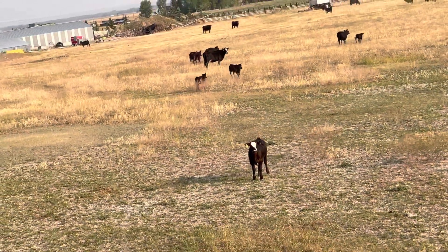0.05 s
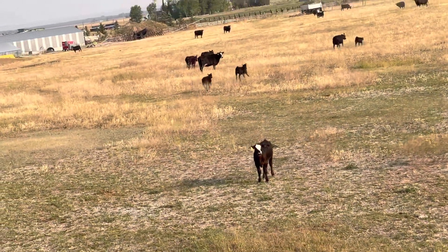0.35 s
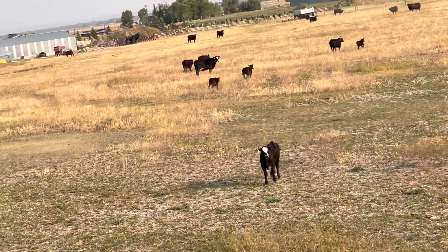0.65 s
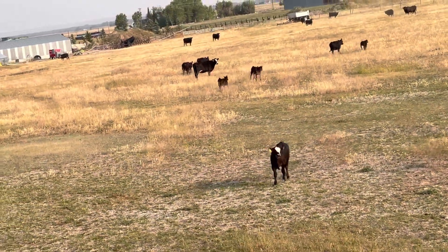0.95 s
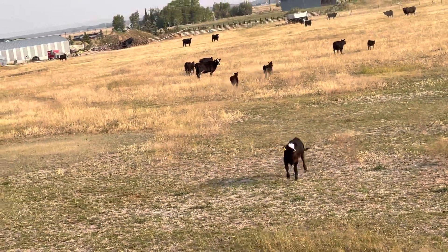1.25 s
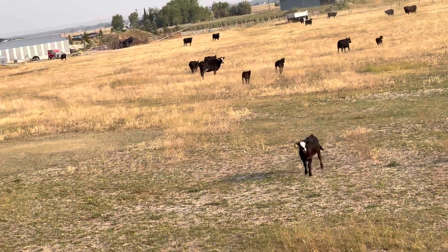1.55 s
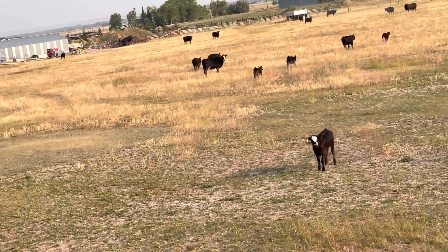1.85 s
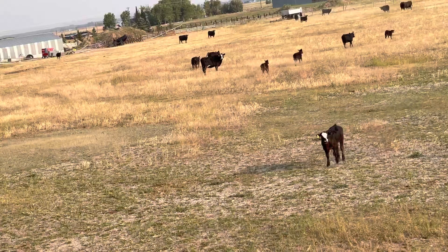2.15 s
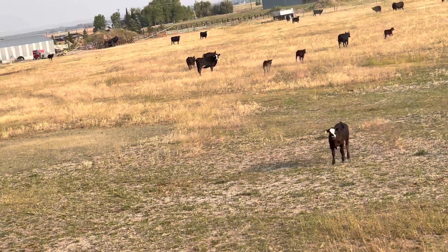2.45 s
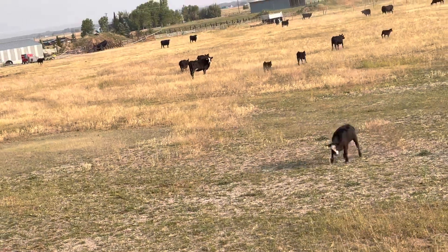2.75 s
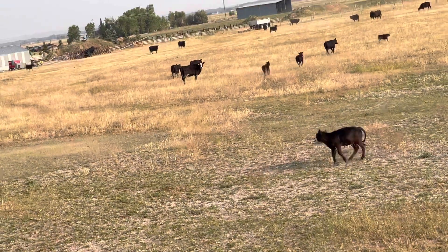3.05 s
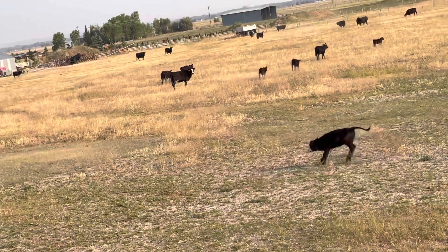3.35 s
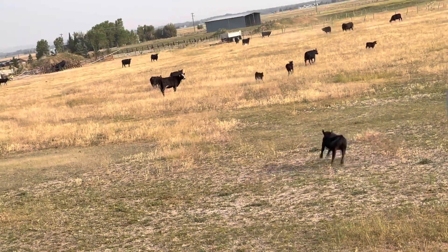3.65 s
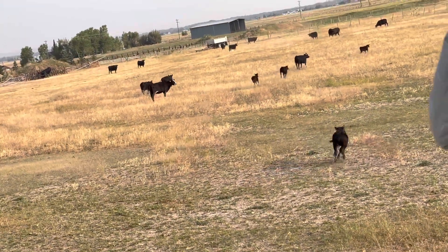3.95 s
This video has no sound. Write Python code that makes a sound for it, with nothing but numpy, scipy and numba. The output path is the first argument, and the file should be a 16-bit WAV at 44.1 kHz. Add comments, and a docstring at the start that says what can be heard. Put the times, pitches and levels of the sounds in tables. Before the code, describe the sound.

A hot air balloon burner fires four short, loud blasts just above the microphone in the basket. Each starts with a gas hiss, swells into a deep rushing roar and fades, with a faint pilot flame rumble between.

```python
"""Hot air balloon burner

A propane burner fires four blasts just above a microphone in the basket. The turbulent gas jet
hisses as soon as the valve opens; the flame rushes, and its deep roar builds a moment later.
Between blasts the pilot flame rumbles and the valve handle ticks faintly."""
import sys
import numpy as np
from scipy.fft import rfft, irfft, next_fast_len
from scipy.io import wavfile
from scipy.ndimage import map_coordinates
from numba import njit

SR = 44100
rng = np.random.default_rng(int(sys.argv[2]) if len(sys.argv) > 2 else 0)


def dump(signal):
    """Clip the signal to [-1, 1] and save it as 16-bit WAV at the path in sys.argv[1]."""
    limited = np.clip(np.atleast_2d(signal).T, -1, 1)
    pcm = np.round(limited * 32767).astype(np.int16)
    wavfile.write(sys.argv[1], SR, pcm)


N = 176400
TIME_S = np.arange(N) / SR


def amp(db):
    """Amplitude ratio of a level in decibels."""
    return 10 ** (np.asarray(db) / 20)


def unit_rms(x):
    """Normalisation to unit power."""
    return x / np.sqrt(np.mean(x ** 2) + 1e-20)


def curve_at(points, hz):
    """Interpolation on a logarithmic frequency axis."""
    knots_hz, values = np.transpose(points)
    return np.interp(np.log(hz + 1), np.log(knots_hz + 1), values)


def filtered(x, response):
    """Linear filtering: the spectrum is multiplied by a frequency response."""
    size = next_fast_len(N + SR // 2)
    return irfft(rfft(x, size) * response(np.fft.rfftfreq(size, 1 / SR)), size)[..., :N]


def wobble(rate_hz):
    """Spline interpolation of random values gives a smooth fluctuation."""
    knots = rng.standard_normal(int(N * rate_hz / SR) + 4)
    return map_coordinates(knots, [TIME_S * rate_hz])


def turbulence(flutter_db, crackle_db):
    """Turbulence modulates amplitude with slow flutter and fast crackle."""
    return unit_rms(amp(flutter_db * wobble(35.03) + crackle_db * wobble(500)))


# Left-right likeness of the sound, nearly mono from 1.5 to 4.5 kHz: frequency_hz, correlation
STEREO_COHERENCE = [(60, .997), (250, .972), (500, .95), (1150, .91), (1550, .9995), (4500, .999),
                    (4900, .93), (5350, .94), (5800, .72), (7900, .78), (8450, .999), (9000, .995),
                    (9400, .93), (10000, .81), (12000, .81), (13000, .92), (13300, 1)]

def stereo_noise(spectrum):
    """Partial coherence: left and right are the sum and difference of independent noises."""
    def mid_side_gains(hz):
        angle = np.arccos(np.clip(curve_at(STEREO_COHERENCE, hz), 0, 1)) / 2
        return amp(curve_at(spectrum, hz)) * [np.cos(angle), np.sin(angle)]
    mid, side = filtered(rng.standard_normal((2, N)), mid_side_gains)
    return unit_rms(np.array([mid + side, mid - side]))


def basket_echoes(direct, count=8, gain_db=-13.5, low_hz=600, high_hz=5500):
    """Early reflection: burner frame and basket return weak, band-limited copies."""
    delays_s = rng.uniform(.002, .02, count)
    echoes = sum((-1) ** k * np.pad(direct, ((0, 0), (int(delay_s * SR), 0)))[:, :N]
                 for k, delay_s in enumerate(delays_s))
    band = lambda hz: hz ** 2 / (hz ** 2 + low_hz ** 2) / (1 + (hz / high_hz) ** 2)
    return filtered(echoes, band) * amp(gain_db) / np.sqrt(count)


# Spectrum of the pilot flame: frequency_hz, density_db
PILOT_SPECTRUM = [(20, -21), (45, -7), (85, 2.5), (140, -4.5), (210, -16), (300, -21), (420, -21),
                  (600, -26), (720, -35), (900, -34), (1400, -42), (4000, -50), (8000, -55), (16000, -60)]

def pilot_flame():
    """Combustion noise: the small flame that stays lit rumbles steadily."""
    return amp(-53) * stereo_noise(PILOT_SPECTRUM)


# Ticks of the valve handle: start_s, level_db, ring_re_rattle_db
HANDLE_TICKS = [(1.123, -63, -22), (1.170, -62, -9), (1.207, -68, -22), (2.931, -69, -25),
                (2.996, -68, -25), (3.035, -71, -20), (3.944, -73, -27)]
# Spectrum of the rattle: frequency_hz, density_db
RATTLE_SPECTRUM = [(500, -20), (1500, -4), (6500, -5), (9000, -5), (13000, 2), (16000, -4)]

def valve_handle(attack_s=.001, rattle_t60_s=.08, ring_hz=13300, ring_t60_s=.13):
    """Damped vibration: each tick is a short rattle with a thin metallic ring."""
    out, noise = np.zeros((2, N)), stereo_noise(RATTLE_SPECTRUM)
    for start_s, level_db, ring_db in HANDLE_TICKS:
        age_s = np.maximum(TIME_S - start_s, 0)
        rattle = amp(-60 * age_s / rattle_t60_s) * noise
        ring = amp(ring_db - 60 * age_s / ring_t60_s) * np.sin(2 * np.pi * ring_hz * age_s)
        out += amp(level_db) * (1 - np.exp(-age_s / attack_s)) * (rattle + ring)
    return out


@njit
def flame_size(drive, build_s, die_s):
    """First-order lag: the flame grows and dies with separate time constants."""
    size = drive.copy()
    for i in range(1, len(drive)):
        gap = drive[i] - size[i - 1]
        size[i] = size[i - 1] + gap / (SR * (build_s if gap > 0 else die_s))
    return size


# Spectrum of the deepest part of the flame: frequency_hz, density_db
RUMBLE_SPECTRUM = [(15, -33), (28, -26), (40, -13.5), (52, -2), (72, 1.5), (100, -3), (160, -13.5),
                   (400, -41)]

def flame_rumble(drive):
    """Low-frequency combustion noise grows as a power of flame size."""
    size = flame_size(drive, build_s=.055, die_s=.02)
    return amp(-21.5) * size ** .77 * stereo_noise(RUMBLE_SPECTRUM)


# Spectrum of the roar and of the ignition puffs: frequency_hz, density_db
ROAR_SPECTRUM = [(45, -31), (100, -5), (140, 1), (200, -3.5), (260, -3), (315, -5.5), (385, -2.5),
                 (470, -6.5), (600, -10), (725, -18.5), (810, -15.5), (950, -19), (1200, -27), (2000, -45)]

def flame_roar(drive):
    """Turbulent combustion: the roar lags the valve while the flame grows."""
    size = flame_size(drive, build_s=.059, die_s=.0075)
    return amp(-15) * size ** .78 * stereo_noise(ROAR_SPECTRUM) * turbulence(.23, .5)


# Puffs as the flame catches: start_s, level_db
PUFFS = [(1.254, -25), (2.012, -21.5), (3.088, -26.5)]

def ignition_puffs(attack_s=.008, t60_s=.48):
    """Ignition transient: the first gas catches with a low puff that decays exponentially."""
    out, noise = np.zeros((2, N)), stereo_noise(ROAR_SPECTRUM)
    for start_s, level_db in PUFFS:
        age_s = np.maximum(TIME_S - start_s, 0)
        out += amp(level_db - 60 * age_s / t60_s) * (1 - np.exp(-age_s / attack_s)) * noise
    return out


# Spectrum of the rushing flame: frequency_hz, density_db
RUSH_SPECTRUM = [(500, -23), (1000, -0.5), (1300, -1.5), (1800, 1), (2300, -1), (2900, -0.5), (3300, -4.5),
                 (3500, -2), (3750, -5), (4100, -2.5), (4500, -5.5), (5200, -2), (6300, -5.5), (8000, -8.5),
                 (15000, -15)]

def flame_rush(level_db):
    """Combustion noise: the broad rush follows its own contour, swelling just after the hiss."""
    return amp(level_db) * stereo_noise(RUSH_SPECTRUM) * turbulence(.37, .7)


# Spectrum of the gas jet: frequency_hz, density_db
JET_SPECTRUM = [(3000, -32), (5500, -13), (7000, -6.5), (8200, -4), (9200, -5), (10500, 0), (12000, -1),
                (13400, 1.5), (14800, -2.5), (16000, -7)]

def gas_jet(level_db, trim_db=2):
    """Jet noise: escaping propane hisses as it mixes turbulently with the air."""
    return amp(level_db + trim_db) * stereo_noise(JET_SPECTRUM) * turbulence(.63, .65)


# Level contours, one list per blast: time_s, jet_db (before trim), flame_db
BLAST_LEVELS = [
    [(0.0, -25.5, -32.5), (0.04, -24.5, -31.5), (0.086, -31, -32.5), (0.114, -29.5, -33), (0.248, -38, -37),
     (0.342, -26.5, -33.5), (0.47, -23.5, -31), (0.652, -27.5, -33), (0.82, -36, -37), (0.942, -52, -48.5),
     (1.044, -79, -75.5), (1.062, -95, -77), (1.116, -93, -91), (1.12, -86, -91)],
    [(1.21, -71, -96), (1.228, -93, -86), (1.246, -56, -52), (1.264, -39.5, -43), (1.296, -30, -40),
     (1.336, -28, -34.5), (1.484, -25.5, -33), (1.684, -28.5, -34), (1.866, -41, -41), (1.92, -51, -46),
     (1.99, -66, -61)],
    [(1.99, -65, -59), (2.008, -43, -45.5), (2.046, -28, -36), (2.21, -23.5, -32), (2.326, -22.5, -32),
     (2.518, -27.5, -33), (2.764, -41.5, -40.5), (2.864, -63, -55), (2.946, -93, -90), (2.98, -90, -90)],
    [(3.05, -92, -100), (3.064, -91, -91), (3.078, -61, -60.5), (3.098, -45.5, -42.5), (3.12, -33, -39),
     (3.154, -27, -35), (3.294, -23.5, -31), (3.368, -27.5, -32.5), (3.394, -25.5, -30), (3.524, -28, -33),
     (3.734, -49, -42.5), (3.814, -66.5, -63), (3.864, -90, -82), (3.92, -92, -91)],
]

def burner(full_flame_db=-30):
    """Superposition: the jet contour drives the hiss; the flame contour, rush, roar and rumble."""
    times_s, *contours = np.vstack(BLAST_LEVELS).T
    jet_db, flame_db = [np.interp(TIME_S, times_s, contour) for contour in contours]
    drive = amp(flame_db - full_flame_db)  # 1 with the valve wide open
    return gas_jet(jet_db) + flame_rush(flame_db) + flame_roar(drive) + flame_rumble(drive)


# Phase of left against right, centred from 1.5 to 4.5 kHz: frequency_hz, left_lead_rad
STEREO_LEAD = [(60, 0), (200, -.2), (280, -.42), (450, -.37), (620, -.65), (790, -1.2), (1000, -.75),
               (1300, -.35), (1500, 0), (4550, 0), (5250, .17), (5500, -.3), (5770, -1.6), (6400, -.65),
               (6800, -.6), (7200, -1.2), (7600, -2.45), (8050, -2.45), (8400, -3.14), (9100, -3.16),
               (9500, -3.3), (9850, -3.8), (12100, -5.4), (13200, -6.283)]
# Level of left against right: frequency_hz, left_minus_right_db
STEREO_BALANCE = [(60, -1.0), (99, -1.2), (160, -1.5), (270, -2.7), (450, -0.66), (740, -1.4), (1220, -0.5),
                  (2010, 0.37), (3330, 0.0), (5500, 0.0), (9080, 0.0), (15000, 0.0)]

def scene():
    """Stereo image: direct and reflected sound differ in phase and level from left to right."""
    half = np.array([[.5], [-.5]])  # left, right
    def image(hz):
        gain = amp(half * curve_at(STEREO_BALANCE, hz))
        return gain * np.exp(1j * half * curve_at(STEREO_LEAD, hz))
    direct = burner() + ignition_puffs() + pilot_flame() + valve_handle()
    return filtered(direct + basket_echoes(direct), image)


def record(dry):
    """Band limiting: a steep low-pass removes the highest treble."""
    cutoff_hz, order = 15830, 300
    return filtered(dry, lambda hz: 1 / (1 + (hz / cutoff_hz) ** order))


dry = scene()
out = record(dry)
dump(out)
```